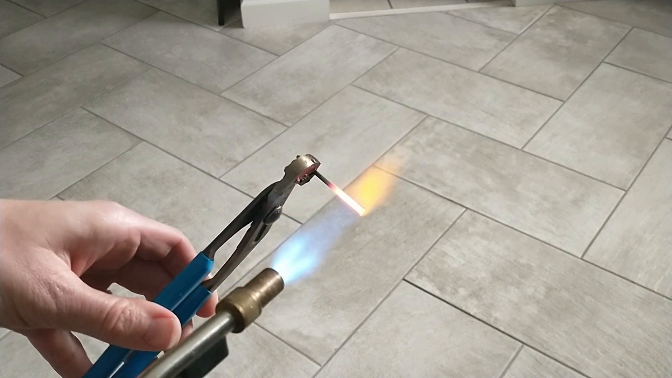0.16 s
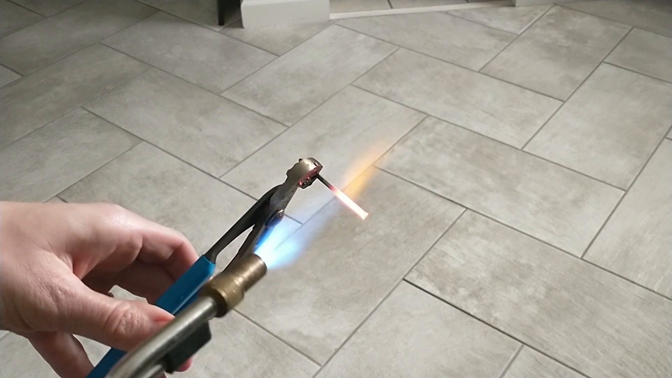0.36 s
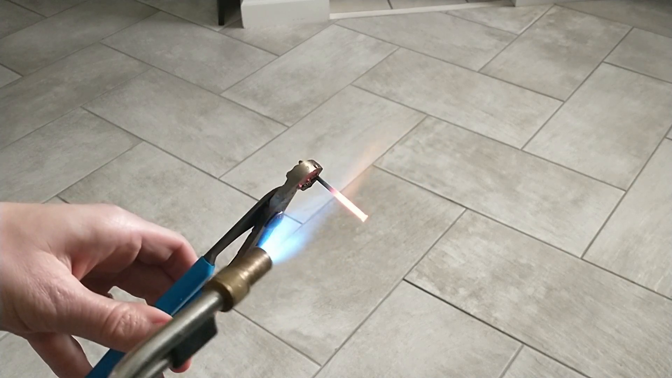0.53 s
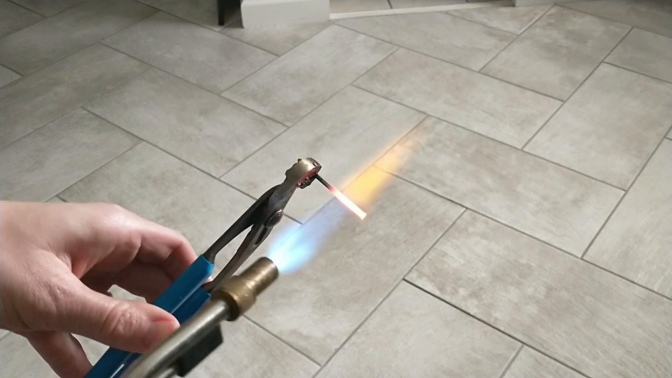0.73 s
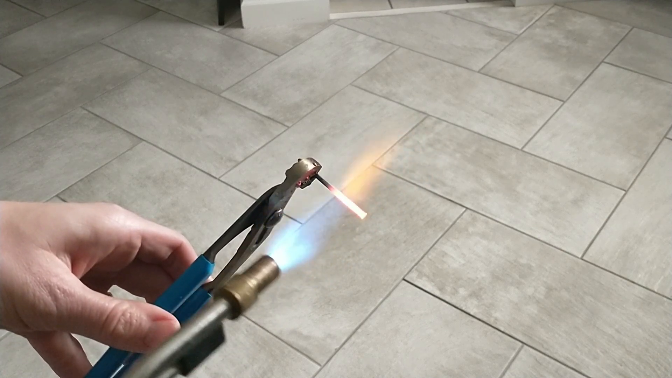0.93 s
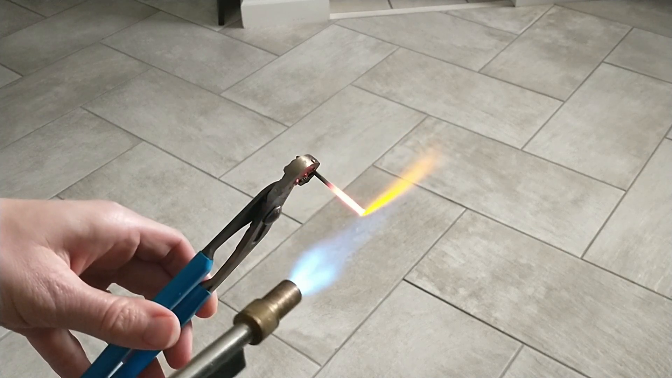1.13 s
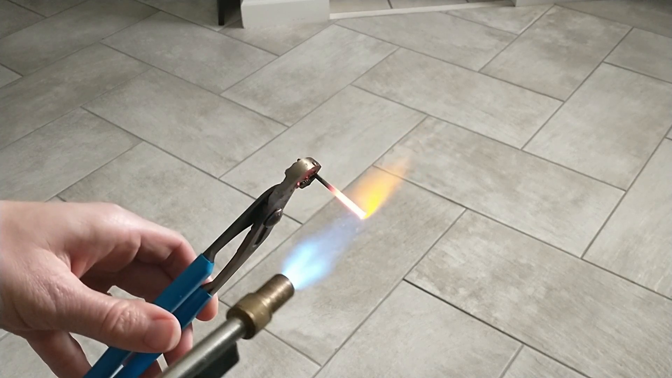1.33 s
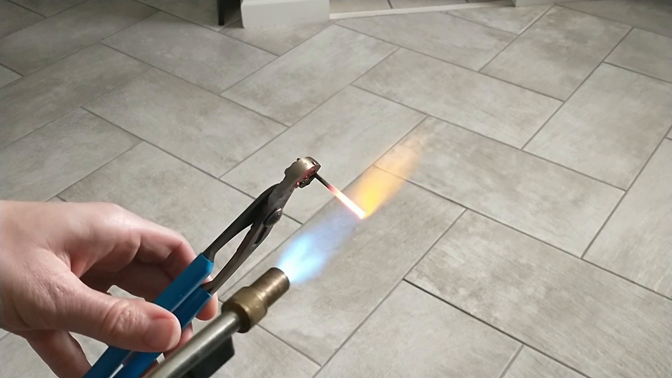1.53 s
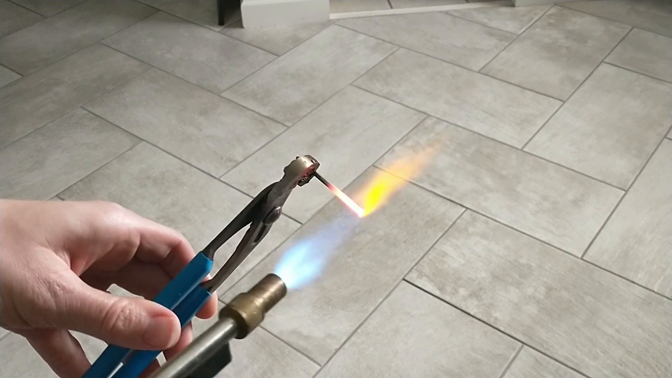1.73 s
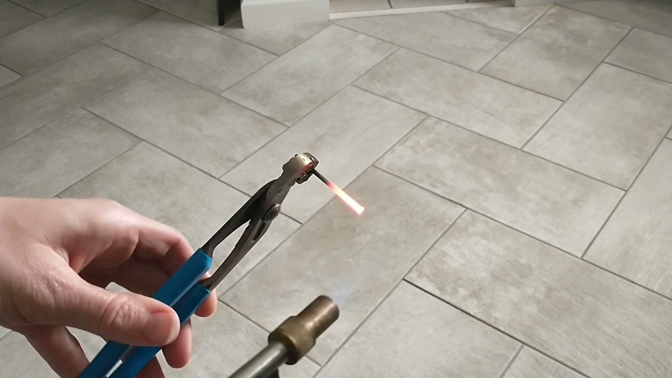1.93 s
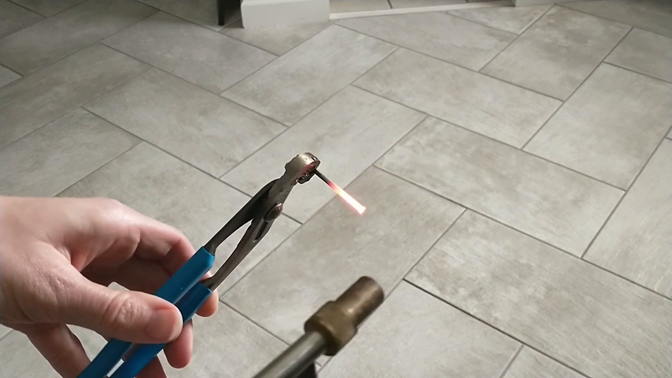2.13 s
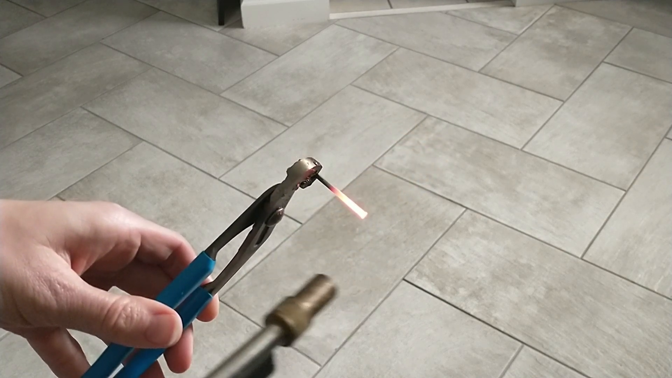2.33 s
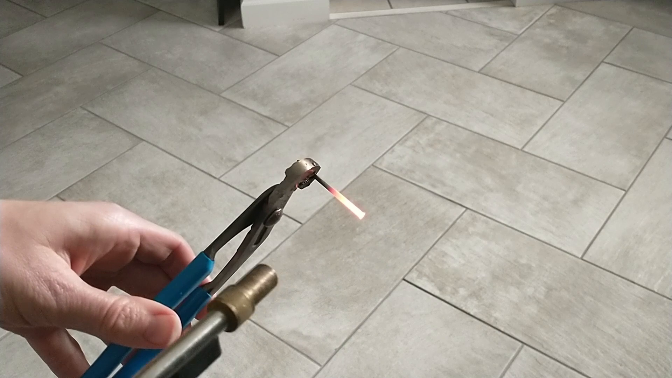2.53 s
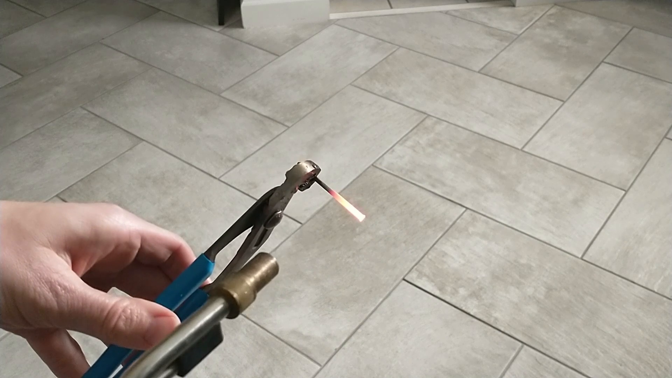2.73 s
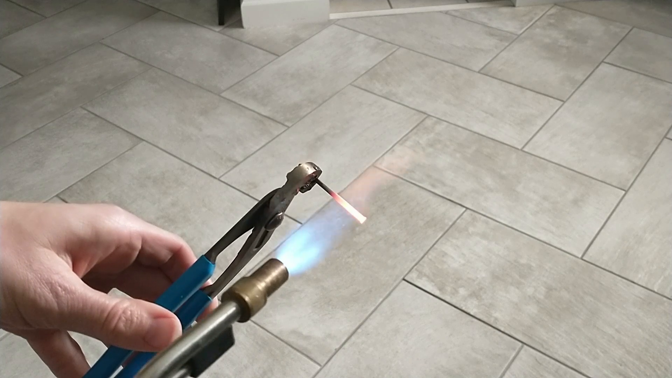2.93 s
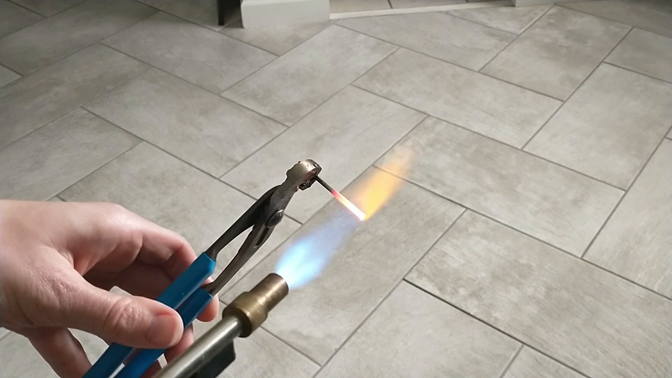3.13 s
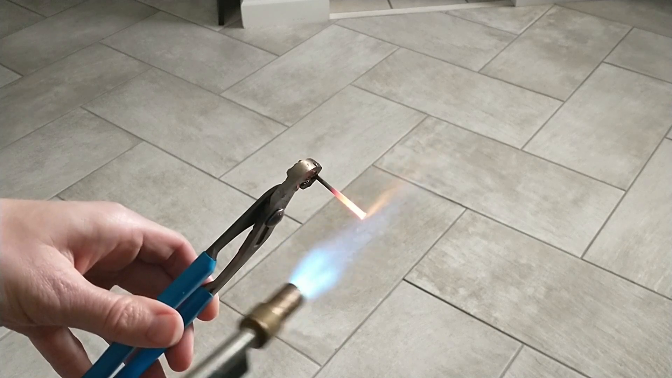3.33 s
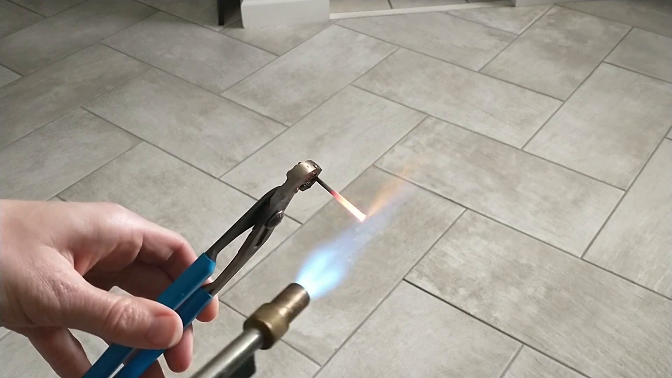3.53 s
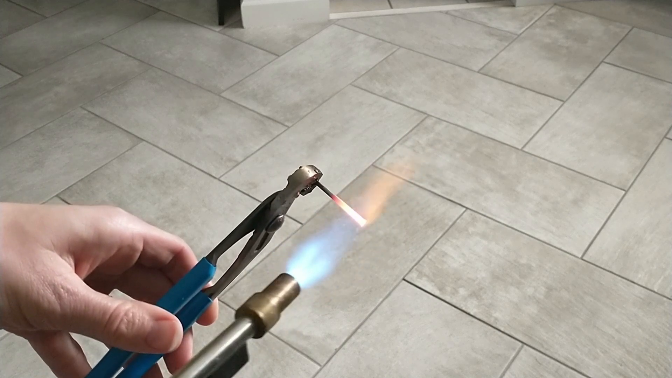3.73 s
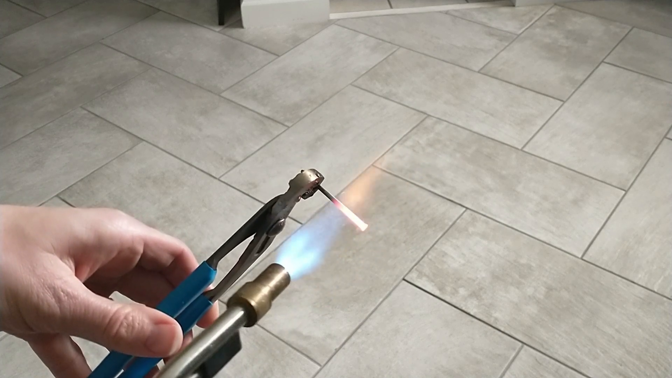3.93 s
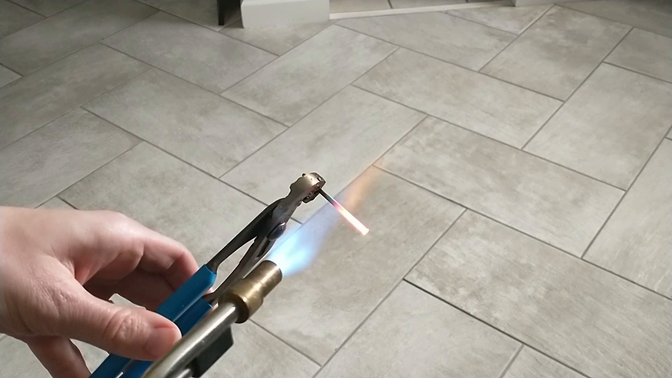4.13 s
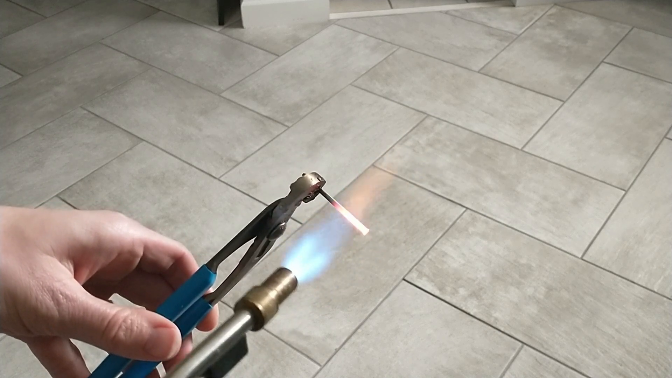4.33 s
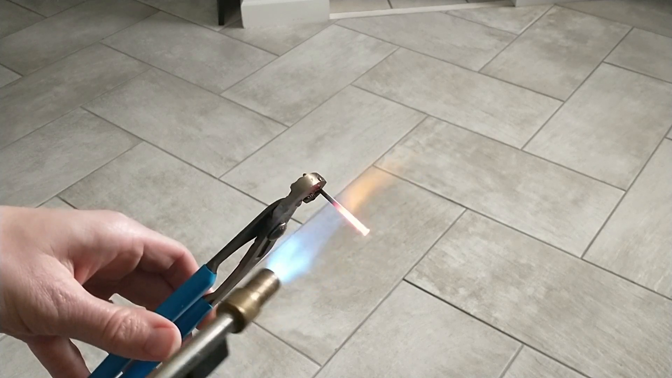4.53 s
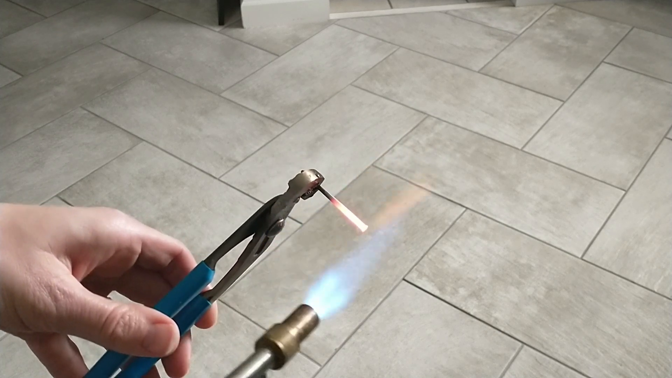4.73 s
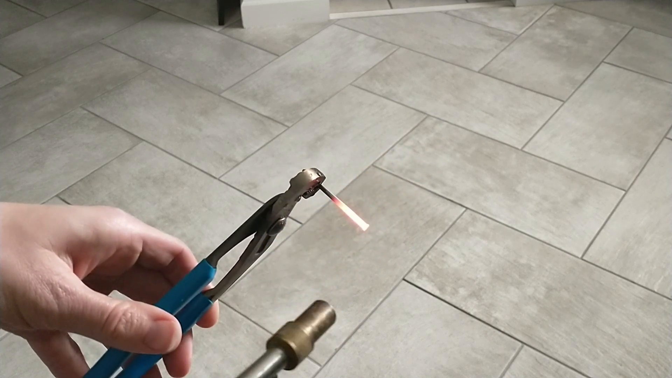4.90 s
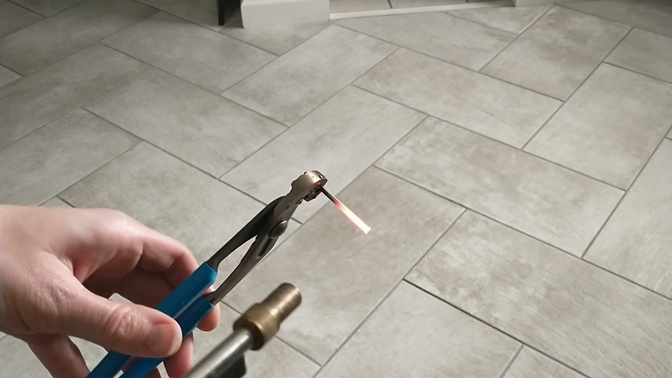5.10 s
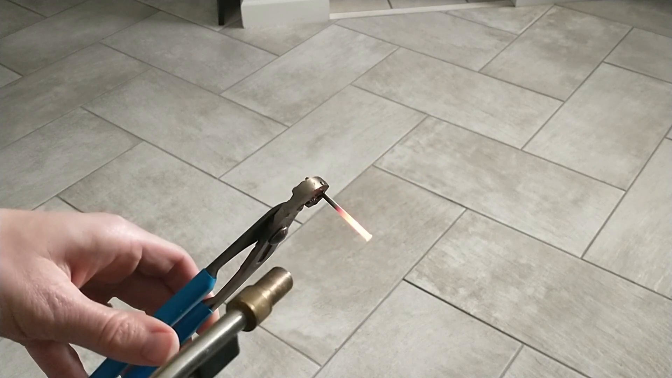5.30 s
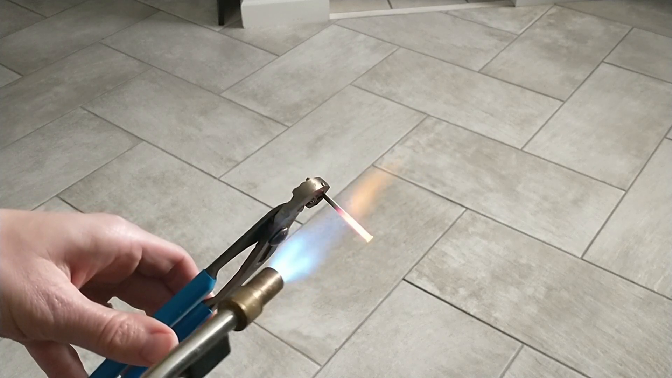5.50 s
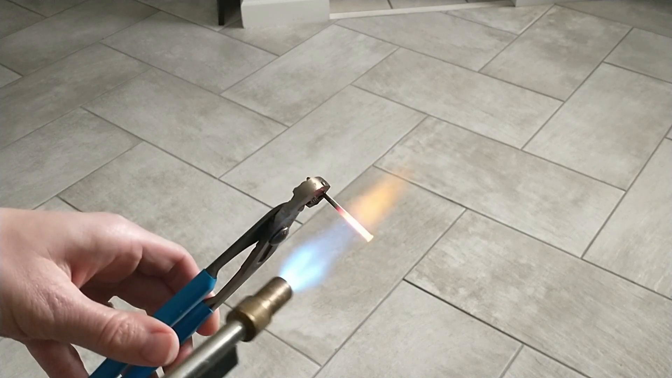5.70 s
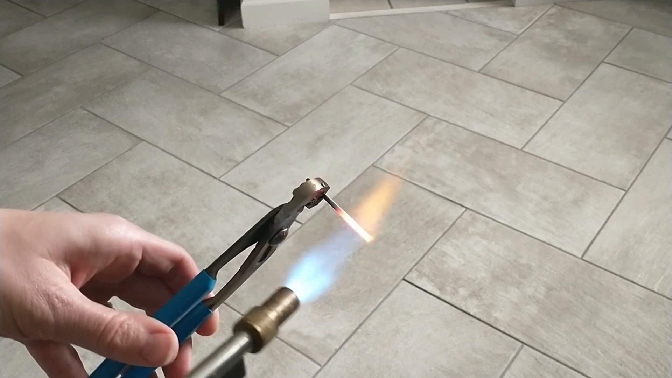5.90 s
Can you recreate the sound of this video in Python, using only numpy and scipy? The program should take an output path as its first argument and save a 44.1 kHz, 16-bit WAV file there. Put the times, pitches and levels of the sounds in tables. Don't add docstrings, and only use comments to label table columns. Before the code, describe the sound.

Close by, a gas torch burns with a broad, breathy roar and bright jet hiss. The valve closes, the flame sighs down and pops back into its tube with a tiny chirp. After near silence and faint ticks, a puff of gas, a hard igniter snap and a thump start a louder, sizzling burn. It stops and restarts likewise. Phone microphone, bare tiled room.

```python
import sys
import numpy as np
from scipy import signal
from scipy.fft import rfft, irfft, next_fast_len
from scipy.io import wavfile
from scipy.ndimage import uniform_filter1d

SR = 44100
rng = np.random.default_rng(int(sys.argv[2]) if len(sys.argv) > 2 else 0)


def dump(signal):
    limited = np.clip(np.atleast_2d(signal).T, -1, 1)
    pcm = np.round(limited * 32767).astype(np.int16)
    wavfile.write(sys.argv[1], SR, pcm)


def gain_from_db(level_db):
    decades = np.asarray(level_db, float) / 20
    return 10 ** decades


N = 267233
TIME = np.arange(N) / SR
SIZE = next_fast_len(N + SR // 2)
HZ = np.maximum(np.arange(SIZE // 2 + 1) * SR / SIZE, 1)


def unit(x):
    return x / np.sqrt(np.mean(x ** 2))


def shape(x, gain):
    return irfft(rfft(x, SIZE) * gain, SIZE)[..., :N]


def over_hz(points):
    hz, value = np.transpose(points)
    return np.interp(np.log(HZ), np.log(hz), value)


def resonance(hz, width):
    return 1 / (1 + 1j * (HZ ** 2 - hz ** 2) / (HZ * width))


def body(modes):
    return sum((-1) ** k * gain_from_db(db) * resonance(hz, width) for k, (hz, width, db) in enumerate(modes))


def walk(rate):
    hold = int(SR / rate)
    held = rng.standard_normal(400)[np.arange(N) // hold % 400]
    return unit(uniform_filter1d(uniform_filter1d(held, hold), hold))


def played(start_s, end_s, db, db_per_s, attack_s=1e-4):
    fade_db = db_per_s * np.maximum(TIME - end_s, 0)
    return gain_from_db(db - fade_db) * np.clip((TIME - start_s) / attack_s, 0, 1)


def growing(lit_s):
    return -6 * np.exp(-np.maximum(TIME - lit_s, 0) / .1)


# (frequency [Hz], level [dB per Hz])
BACKGROUND = [(30, -13), (70, -13), (105, -12), (140, -3), (220, -11), (500, -20), (3000, -26),
              (16000, -32)]


def background():
    mid, side = rng.standard_normal((2, N))
    colour = gain_from_db(over_hz(BACKGROUND))
    rumble = shape(mid, colour) * gain_from_db(1.5 * walk(7.6))
    own_noise = shape(side, colour * np.clip(HZ / 600, .2, 1))
    return unit(rumble + own_noise * np.array([[1], [-1]])) * gain_from_db(-68)


def draught():
    jet = sum(played(lit, shut, db + growing(lit), dies) for lit, shut, db, _, dies in BURNS)
    wind = unit(shape(rng.standard_normal((2, N)), resonance(60, 79)))
    return wind * jet * gain_from_db(-42)


# (time [s], peak
# [dB], pitch [Hz], width [Hz])
TICKS = [(2.077, -60, 800, 500), (2.068, -67, 2350, 200), (2.288, -58, 900, 700), (2.289, -60, 5000, 6000),
         (2.425, -60, 4000, 5000), (2.44, -62, 6000, 5000), (4.649, -36, 5700, 2500),
         (4.649, -44, 14000, 5000), (4.692, -41, 14000, 2500), (4.692, -49, 7000, 6000),
         (4.712, -39, 9800, 3000), (4.712, -35, 4400, 1500), (4.712, -40.5, 2900, 500),
         (4.712, -32, 5900, 1200), (1.855, -43, 2850, 250), (1.854, -44, 1800, 1500),
         (4.963, -54, 900, 700), (5.002, -62, 450, 400), (5.046, -61, 750, 400), (5.095, -56.5, 1200, 700),
         (5.0945, -40.5, 7200, 900), (2.7472, -18.5, 5200, 500), (5.1757, -18.5, 5100, 600)]


def ticks():
    knocks = 0
    for s, db, hz, width in TICKS:
        to_peak = np.e * SR / (2 * np.pi * width)
        at_time = np.exp(-2j * np.pi * HZ * s)
        knocks = knocks + gain_from_db(db) * to_peak * resonance(hz, width) ** 2 * at_time
    return irfft(knocks, SIZE)[:N]


# (valve opens [s], spark [s], level [dB])
COLD_GAS = [
    (2.684, 2.745, -48.5),
    (5.119, 5.174, -47.5),
]
# (frequency [Hz], width [Hz], level [dB])
COLD_TUBE = [(1050, 100, 1), (2450, 400, -14), (3000, 500, -16), (3600, 400, -13), (4950, 300, 1),
             (5750, 400, 2), (6500, 700, 3), (8300, 1200, -6), (9950, 500, 0), (12500, 3000, -11)]


def cold_gas():
    rush = unit(shape(rng.standard_normal(N), body(COLD_TUBE)))
    return rush * sum(played(opens, spark, db, 6000, attack_s=.01) for opens, spark, db in COLD_GAS)


# (time [s], peak [dB], length [s])
SNAPS = [
    (2.7457, -15, .0022),
    (5.1744, -15.5, .0018),
    (5.0942, -41, .0014),
]
# (frequency [Hz], width [Hz], level [dB])
IGNITER = [(1200, 900, -12), (2500, 700, -10), (5000, 700, 0), (7300, 1500, 3), (10000, 1500, 0),
           (14000, 3000, -7)]


def igniter():
    envelope = 0
    for s, db, length in SNAPS:
        fade = np.exp(-np.minimum(((TIME - s) / length) ** 4, 99))
        envelope = envelope + gain_from_db(db) * (TIME >= s) * fade
    return gain_from_db(4.5) * shape(rng.standard_normal(N) * envelope, body(IGNITER))


# (time [s], peak [dB], width [s])
THUMPS = [
    (2.7521, -10.5, .00035),
    (5.1803, -19, .0005),
    (5.1875, -17.5, .0002),
    (1.8555, -29, .00035),
    (1.9065, -41, .0004),
    (4.7118, -20.5, .00018),
    (4.7625, -40.5, .0006),
]


def thumps():
    def bump(s, width):
        return np.exp(-((TIME - s) / width) ** 2 / 2)

    out = 0
    for s, db, width in THUMPS:
        swing_back = .3 * bump(s + 4.4 * width, 2.2 * width)
        out = out + gain_from_db(db) * (swing_back - bump(s, width))
    return out


# (time [s], tone [dB], tone swell [dB per s], flutter [dB], afterglow before the pop [dB])
FLASHBACKS = [
    (1.855, -51, -60, -53, -35),
    (4.713, -50, 200, -47, -42),
]
SING_S, LAST_PUFF_S = .039, .048


def singing():
    out, waver = 0, 1 + 0.0086 * walk(150)
    top_hz, top_s, rise_hz_per_s, sag_hz_per_s = 1340, .017, 3000, 2300
    for s, db, swell, _, _ in FLASHBACKS:
        age = np.clip(TIME - s, 0, .1)
        climb = rise_hz_per_s * np.maximum(top_s - age, 0)
        sag = sag_hz_per_s * np.maximum(age - top_s, 0)
        hz = top_hz - climb - sag
        held = played(s, s + SING_S, db + swell * np.minimum(age, .03), 3000)
        puff_s, puff_db = s + LAST_PUFF_S, db + swell * .015 + 3
        puff = played(puff_s, puff_s + .003, puff_db, 1600, attack_s=.003)
        tone = np.sqrt(2) * np.sin(2 * np.pi * np.cumsum(hz * waver) / SR)
        out = out + tone * (held + puff)
    return out


# (frequency [Hz], width [Hz], level [dB])
RUMBLE = [(201, 100, 8), (291, 110, 8), (514, 220, -1.5), (800, 160, -25.5)]


def embers():
    rumble = unit(shape(rng.standard_normal(N), body(RUMBLE)))
    unsteady = unit(shape(rng.standard_normal(N), resonance(30, 60)))
    out = 0
    for (_, shut, _, _, dies), (s, _, _, flutter_db, glow_db) in zip(BURNS, FLASHBACKS):
        hz = 950 * 2 ** (-np.maximum(TIME - shut, 0) / .09)
        sigh = gain_from_db(-3) * unsteady * np.sin(2 * np.pi * np.cumsum(hz) / SR)
        glow = played(shut, shut + .02, glow_db, .43 * dies, .02)
        puff_s = s + LAST_PUFF_S
        flutter = played(s, s + SING_S - .004, flutter_db, 3000, .01)
        flutter = flutter + played(puff_s, puff_s + .01, flutter_db, 380, .004)
        out = out + (rumble + sigh) * glow + rumble * flutter
    return out


def turbulence(points, swell, flicker_db, rate):
    noise = rng.standard_normal((2, N))
    noise = noise - 0.072 * (uniform_filter1d(noise, size=8) ** 2 * 8 - 1)
    coloured = rfft(noise, SIZE) * gain_from_db(over_hz(points))
    lowest, highest = int(np.log2(points[0][0])), int(np.ceil(np.log2(points[-1][0])))
    out = 0
    for octave in range(lowest, highest + 1):
        in_octave = np.clip(1 - abs(np.log2(HZ) - octave), 0, 1)
        band = irfft(coloured * in_octave, SIZE)[:, :N]
        out = out + gain_from_db(flicker_db * walk(rate)) * band
    return unit(out) * gain_from_db(swell) / np.sqrt(2)


# (lit [s], valve shut [s], full roar [dB], sizzle over roar [dB], dying rate [dB per s])
BURNS = [
    (-1, 1.745, -22.5, -17.5, 700),
    (2.752, 4.6, -22, -9.5, 360),
    (5.178, 7, -21.3, -9.5, 400),
]
# (frequency [Hz], level [dB per Hz])
ROAR = [(40, -36), (80, -27), (130, -15.5), (200, -5), (350, -5), (600, -4), (1000, -3), (1500, -8),
        (2000, -11.5), (2700, -16.5), (3400, -27.5)]
SIZZLE = [(2000, -14.5), (2800, -1.5), (3500, -1.5), (4300, -1), (4800, -8.5), (5500, -2), (6300, -13)]
HISS = [(4500, -22.5), (5600, -5), (6200, 0), (7400, -2), (9000, -1), (11500, -6.5), (12200, -11),
        (14500, -13), (16000, -25.5)]


def flame():
    swell = 0.52 * walk(4.83)
    roar = turbulence(ROAR, swell, flicker_db=0.82, rate=12)
    sizzle = turbulence(SIZZLE, swell, flicker_db=2.1, rate=8)
    hiss = turbulence(HISS, swell, flicker_db=.8, rate=4.4)
    out = 0
    for lit, shut, db, sizzle_db, dies in BURNS:
        size_db = growing(lit)
        metal_db = sizzle_db + .8 * size_db
        jet_db = -6.1 + .25 * sizzle_db - .3 * size_db - .8 * (TIME - lit)
        jet_db = jet_db - .35 * dies * np.maximum(TIME - shut, 0)
        burning = roar + gain_from_db(metal_db) * sizzle + gain_from_db(jet_db) * hiss
        out = out + played(lit, shut, db + size_db, dies) * burning
    return gain_from_db(-.8) * out


# (frequency [Hz], time [s])
ROOM_T60 = [(100, .4), (500, 0.24), (2000, 0.41), (6000, 0.54), (15000, .3)]
# (frequency [Hz], level under the direct sound [dB])
TAIL = [(100, -22), (260, -21), (450, -17), (1200, -9), (3000, -8.5), (8000, -12.5), (15000, -13.5)]


def diffuse():
    age = np.arange(SR // 2) / SR
    scatter = rfft(rng.standard_normal((2, SR // 2)))
    t60 = over_hz(ROOM_T60)
    log_hz = np.log2(np.arange(scatter.shape[1]) * 2 + 1)
    tail = 0
    for octave in range(6, 15):
        fade = gain_from_db(-60 * age / t60[int(2 ** octave * SIZE / SR)])
        decay = fade * np.clip(age / .012, 0, 1)
        band = irfft(scatter * np.clip(1 - abs(log_hz - octave), 0, 1))
        tail = tail + band * decay / np.sqrt(np.sum(decay ** 2))
    return rfft(tail, SIZE) * gain_from_db(over_hz(TAIL))


# (delay left [ms], delay right [ms], level [dB])
ECHOES = [(5.32, 5.3, -14.5), (7.36, 6.2, -13.5), (9.27, 8.4, -10.5), (14.82, 13.22, -20),
          (17.8, 15, -22.5)]


def room(x, lag_ms, tail, wet_db=0):
    def delay(ms):
        return np.exp(-2j * np.pi * HZ * np.asarray(ms)[:, None] / 1000)

    bounces = sum(gain_from_db(db) * delay([left, right]) for left, right, db in ECHOES)
    echoes = bounces / (1 + 1j * HZ / 4970) + tail
    alike = .58 * np.clip(1 - (HZ / 690) ** 6, 0, 1)
    reflected = alike * echoes[0] + (1 - alike) * echoes
    return rfft(x, SIZE) * (delay([0, lag_ms]) + gain_from_db(wet_db) * reflected)


# (frequency [Hz], width [Hz], boost [dB])
LEFT_PORT = [(201, 12, 4), (280, 36, 5.5), (433, 51, 3), (472, 32, -7), (530, 50, 1.5), (880, 250, 2),
             (1460, 150, 3.5), (1916, 350, -5), (2460, 500, 5), (4170, 400, -2.5), (4780, 300, 8.5),
             (6960, 590, 4.5), (9300, 900, -7.5)]
RIGHT_PORT = [(201, 12, 4.5), (277, 30, 5), (433, 51, 2), (476, 32, -7), (560, 90, 3), (743, 110, 3.5),
              (1080, 41, -1), (1505, 37, -6.5), (1880, 100, -0.5), (2042, 72, -8), (2044, 51, 8.5),
              (3240, 1500, 4), (5960, 310, 3.5), (9250, 900, 0.5)]


def ports(spectra):
    colour = []
    for port in (LEFT_PORT, RIGHT_PORT):
        peaks = [1 + (gain_from_db(db) - 1) * resonance(hz, width) for hz, width, db in port]
        colour.append(np.prod(peaks, axis=0))
    return irfft(spectra * colour, SIZE)[:, :N] * gain_from_db(np.array([[.4], [-.4]]))


# (from the nozzle [ms], from the flame's tip [ms])
PORT_LAG_MS = (0.077, 0.11)


def scene():
    nozzle, tip = flame()
    nozzle = nozzle + cold_gas() + igniter() + embers()
    inside = thumps() + singing() + ticks()
    nozzle_lag, tip_lag = PORT_LAG_MS
    near_tail, far_tail = diffuse(), diffuse()
    heard = room(nozzle, nozzle_lag, near_tail) + room(tip, tip_lag, far_tail)
    heard = heard + room(inside, nozzle_lag, near_tail, wet_db=-12)
    return ports(heard) + draught() + background()


def top_cut(x):
    return signal.sosfilt(signal.butter(12, 16540, fs=SR, output="sos"), x)


def record(dry):
    heard = signal.sosfilt(signal.butter(2, 70, "high", fs=SR, output="sos"), dry)
    turned_up = 1 - np.exp(-np.maximum(TIME - 2.76, 0) / .17)
    heard = heard * gain_from_db(6.5 * turned_up)
    heard = heard / (1 + abs(heard / .95) ** 6) ** (1 / 6)
    heard = signal.sosfilt(signal.ellip(8, .2, 40, 15680, fs=SR, output="sos"), heard)
    return top_cut(heard)


dry = scene()
out = record(dry)
dump(out)
```